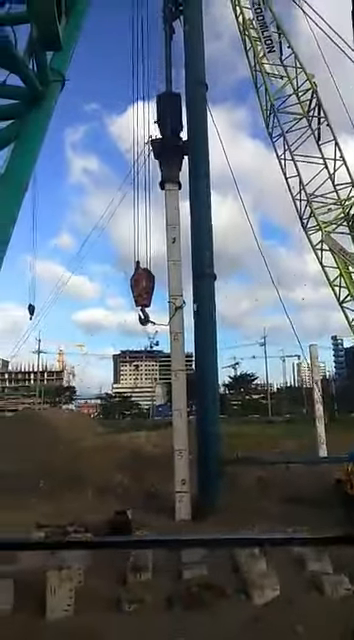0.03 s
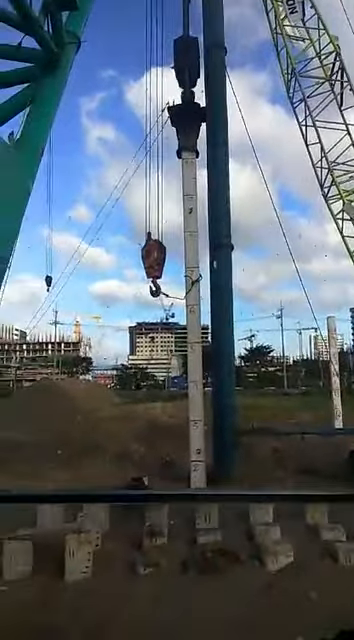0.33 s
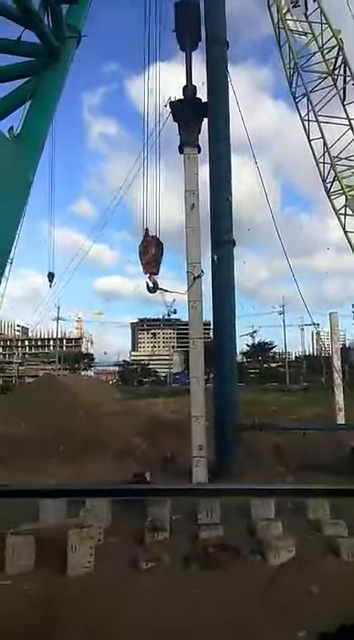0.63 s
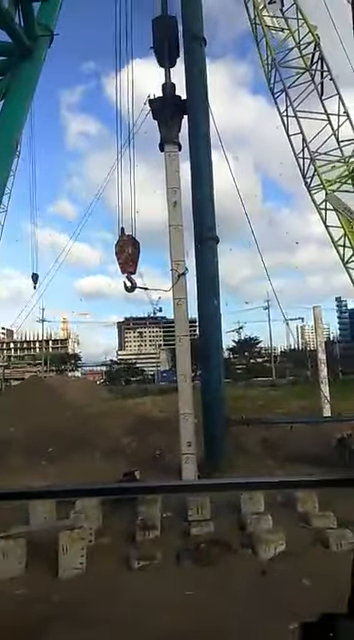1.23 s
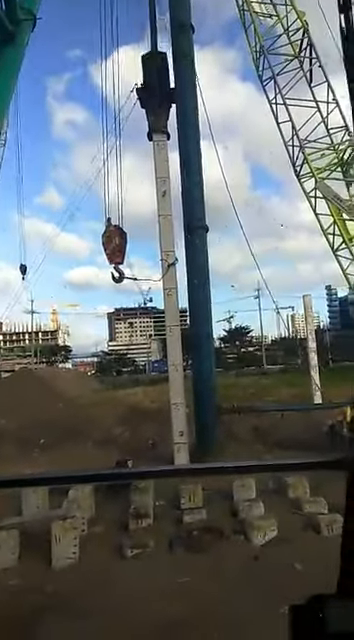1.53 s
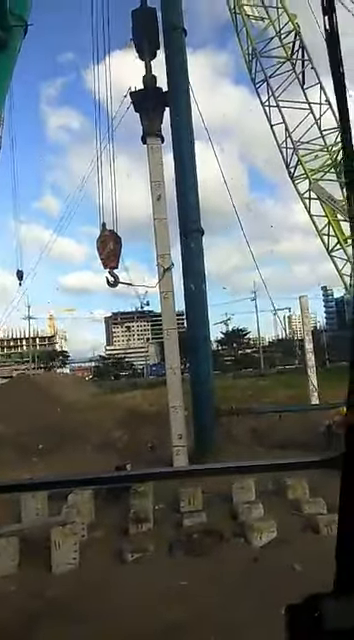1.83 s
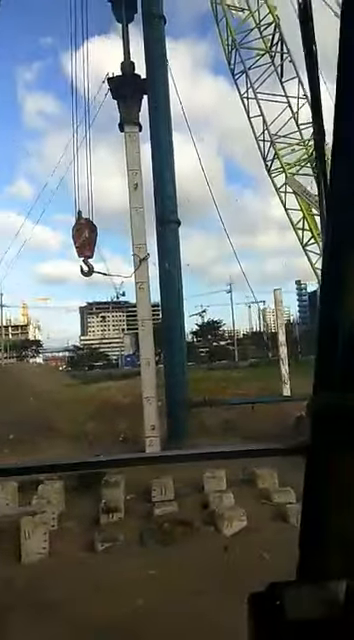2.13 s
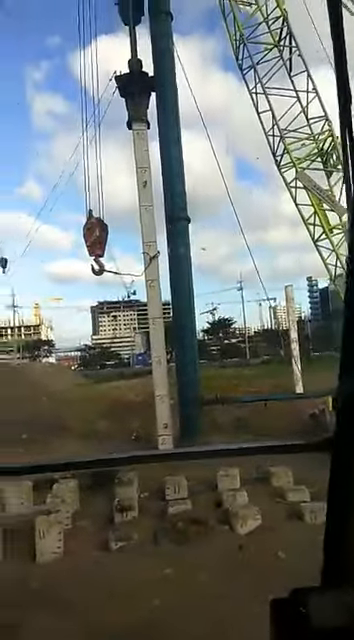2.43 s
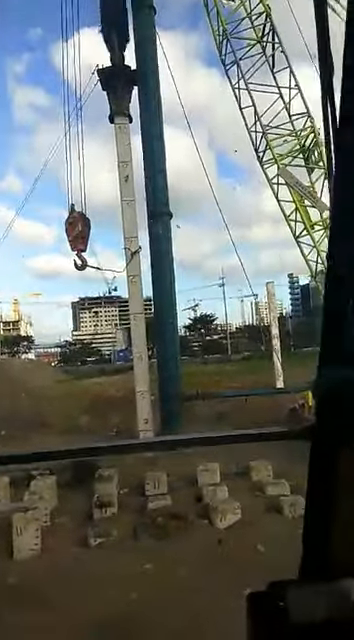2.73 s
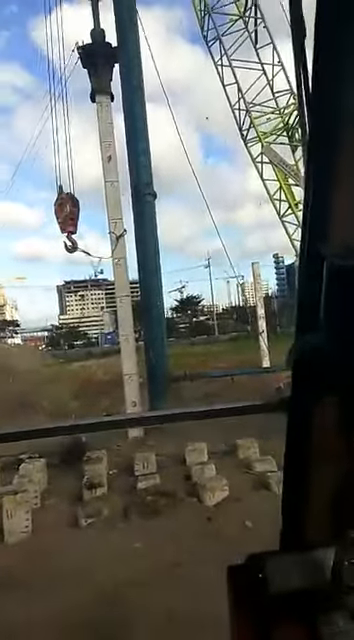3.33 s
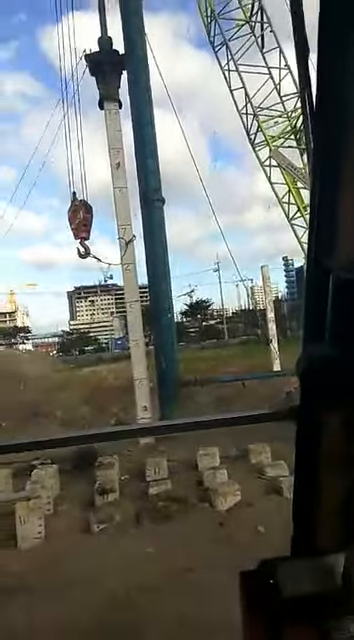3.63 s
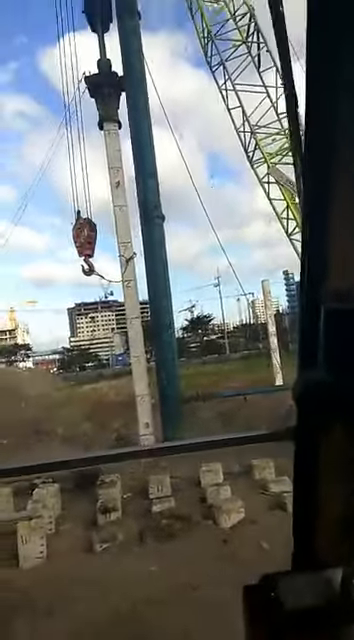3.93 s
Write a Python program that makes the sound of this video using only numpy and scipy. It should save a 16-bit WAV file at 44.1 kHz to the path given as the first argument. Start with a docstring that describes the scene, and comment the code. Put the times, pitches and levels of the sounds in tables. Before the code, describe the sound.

A pile hammer strikes a concrete pile three times, each blow a clack, a hiss, then a steel crash and deep echoing boom. Heard from a cab, with an idling engine, repeated squeaks and loose steel clanking.

```python
"""A pile hammer strikes a concrete pile every 1.4 s, heard on two microphones in an idling machine's cab.
Each cycle is a clack of the release, a hiss and hollow roar as the ram falls, then a steel crash
and a deep beating boom, with the open yard throwing back echoes. A dry bearing squeaks at its own
steady pace, loose steel clanks in between, and the engine hums underneath."""
import sys
import numpy as np
from scipy import signal
from scipy.fft import rfft, irfft
from scipy.io import wavfile

SR = 44100
rng = np.random.default_rng(int(sys.argv[2]) if len(sys.argv) > 2 else 0)


def pcm_store(signal):
    """Save signal as 16-bit PCM."""
    levels = np.round(np.clip(np.atleast_2d(signal), -1, 1) * 32767)
    wavfile.write(sys.argv[1], SR, levels.astype(np.int16).T)


N = 176400


def amp(db):
    """Decibels to gain."""
    return 10 ** (np.asarray(db) / 20)


def pan(db):
    """Microphone gains, the left db louder than the right."""
    return amp([[db / 2], [-db / 2]])


def unit(x):
    """Scales to an rms of one."""
    return x / np.sqrt(np.mean(x ** 2) + 1e-20)


def read(points, hz):
    """Reads a table on a log-frequency axis."""
    f, value = np.transpose(points)
    return np.interp(np.log(hz + 1), np.log(f + 1), value)


def add(mix, s, sound):
    """Mixes a sound in at time s."""
    at = round(s * SR)
    sound = sound[..., max(-at, 0):]
    part = mix[:, max(at, 0):][:, :sound.shape[-1]]
    part += sound[..., :part.shape[1]]


def drift(size, hz):
    """Random wandering, up to about the given rate."""
    f = np.fft.rfftfreq(N, 1 / SR)
    return unit(irfft(rfft(rng.standard_normal(N)) * np.exp(-(f / hz) ** 2), N))[:size]


# How alike the two microphones hear noise: (frequency [Hz], correlation [capped at 1])
MIC_LIKENESS = [(100, 1.2), (280, 0.76), (590, 0.77), (1260, 0.05), (2700, 0)]
def noise(gain_at, size=SR):
    """Noise of a given spectrum at both microphones, alike in the bass only."""
    hz = np.fft.rfftfreq(size, 1 / SR)
    mid, side = rfft(rng.standard_normal((2, size)))
    same = np.clip(read(MIC_LIKENESS, hz), -1, 1)
    mid, side = mid * np.sqrt(1 + same), side * np.sqrt(1 - same)
    return unit(irfft(np.array([mid + side, mid - side]) * gain_at(hz), size))


def broad(points, comb_db, size=SR):
    """Noise that falls away below its first point, combed in the treble by many small resonances."""
    own, shared = np.array([drift(N, 30), drift(N, 30)]), drift(N, 30)
    comb = np.tanh(own + shared)
    def gain_at(hz):
        ripple = comb[:, np.minimum(hz * 10, N - 1).astype(int)] * np.minimum(hz / 2000, 1)
        return amp(read(points, hz) + comb_db * ripple) * np.minimum(hz / points[0][0], 1) ** 2
    return noise(gain_at, size)


def envelope(attack_s, hold_s, t60):
    """One second of rise, hold and exponential release."""
    t = np.arange(SR) / SR
    rise = np.sin(np.pi / 2 * np.minimum(t / attack_s, 1)) ** 2
    return rise * np.exp(-np.log(1000) * np.maximum(t - attack_s - hold_s, 0) / t60)


def ring(modes, attack_s):
    """Struck steel: dying modes that reach each microphone at any phase."""
    t = np.arange(SR) / SR
    return sum(amp(db) * envelope(attack_s, 0, t60) * np.sin(2 * np.pi * (hz * t + rng.random((2, 1))))
               for hz, db, t60 in modes)


def rattle(depth_db, hz):
    """Uneven gain from many small contacts."""
    return unit(amp(depth_db * drift(SR, hz)))


# Engine and pump hum, centred between the microphones: (frequency [Hz], level [dB])
ENGINE_HUM = [(57.5, -35), (86, -33.5), (114, -38), (161, -39), (253, -40.5), (316, -43.5), (405, -39)]
# Rumble and hiss in the cab: (frequency [Hz], relative level [dB])
CAB_RUMBLE = [(20, -17), (42, -19.5), (90, 0.5), (168, -6.5), (192, -14), (242, -9), (276, -11), (409, -12),
              (654, -20), (968, -21), (1260, -25.5), (3760, -33), (12800, -58.5), (16700, -85)]
def engine():
    """The machine idles around the microphones: wavering hum over a slightly throbbing rumble."""
    t = np.arange(N) / SR
    hum = 0
    for hz, db in ENGINE_HUM:
        swell = amp(db + 2.5 * drift(N, hz=1.17))
        pitch = hz + 4.5 * drift(N, hz=6.44)
        hum += swell * unit(np.sin(2 * np.pi * np.cumsum(pitch) / SR))
    rumble = amp(-27.5) * broad(CAB_RUMBLE, comb_db=2, size=N)
    throb = 1 + 0.14 * np.sin(2 * np.pi * 14 * t)
    return hum + rumble * throb * amp(0.38 * drift(N, hz=24))


def yard_echoes(x):
    """Scattered echoes from across the yard, ringing longest from 2.5 to 6 kHz."""
    taps = rng.standard_normal((2, 2 * SR)) * (rng.random((2, 2 * SR)) < .06)
    hz, t, spectra = signal.stft(taps, SR, nperseg=256)
    t60 = read([(200, 2.6), (800, 1.63), (2500, 4.26), (6000, 4.3), (11000, 1.8)], hz)[:, None]
    colour_db = read([(100, -18), (300, -8), (800, -5), (2500, -15.5), (6000, -16), (11000, -21.5)], hz)
    fade = np.minimum(t / 0.052, 1) * np.exp(-np.log(1000) * t / t60)
    tail = signal.istft(spectra * amp(colour_db)[:, None] * fade, SR, nperseg=256)[1]
    return signal.fftconvolve(x, tail / 18, axes=1)[:, :N]


# The arch of one squeak: (time [s], pitch [Hz], relative level [dB])
SQUEAK_ARCH = [(0, 1640, -11), (.007, 1880, -3), (.021, 1965, 4), (.036, 2110, -8), (.058, 2190, -1),
               (.08, 2260, -6), (.11, 2290, 2), (.123, 2270, -14), (.135, 2250, -4), (.154, 2220, -22)]
# Squeaks, close by on the left: (time [s], level [dB], left minus right [dB])
SQUEAK_TURNS = [(-.085, -23.5, 13), (.530, -31, 8), (1.149, -27, 8), (2.367, -29, 4), (2.991, -23, 4),
                (3.607, -27, 5)]
def bearing(mix):
    """A dry bearing sings on each turn, raspy until it catches; echoes in the cab break it up."""
    s, pitch, level = np.transpose(SQUEAK_ARCH)
    t = np.arange(0, s[-1], 1 / SR)
    size = len(t)
    rasp = .012 + .028 * np.exp(-t / .018)
    for start_s, db, pan_db in SQUEAK_TURNS:
        waver = 1 + rasp * drift(size, hz=440) + .006 * drift(size, hz=45)
        phase = 2 * np.pi * np.cumsum(np.interp(t, s, pitch) * waver) / SR
        overtones = sum(amp(-15 - 11 * k + 3.5 * drift(size, hz=60)) * np.sin((k + 2) * phase)
                        for k in range(4))
        slip_db = 2.3 * drift(size, hz=130)
        tone = amp(db + np.interp(t, s, level) + slip_db) * unit(np.sin(phase) + overtones)
        delays_s = rng.uniform(.003, .016, (2, 4, 1))
        echoes = np.interp(t - delays_s, t, tone, left=0).sum(axis=1)
        add(mix, start_s, pan(pan_db) * (tone + amp(-12) * echoes))


# Chatter of loose steel: (frequency [Hz], relative level [dB])
CHATTER_SPECTRUM = [(300, -25), (1200, 2.5), (2000, 1), (3300, -2.5), (4400, 6), (6500, 3), (7600, -9),
                    (11600, -22.5), (12500, -63)]
# Its ringing: (frequency [Hz], relative level [dB], t60 [s])
STEEL_MODES = [(1860, -6.5, 0.045), (2806, -5.5, 0.061), (3908, -4, 0.16), (4130, 0, 0.2), (2250, -7, 0.19),
               (6331, -16, 0.094), (7235, -12, 0.083), (8340, -9.5, .08), (9350, -15, 0.11),
               (10170, -19.5, 0.35)]
# Clanks, close by on either side:
# (time [s], level [dB], attack [s], relative ring [dB], relative thud [dB], left minus right [dB])
STEEL_CLANKS = [(.797, -29.5, 0.013, -24, -3, -2), (1.165, -22, 0.0088, -29, 0.5, 1),
                (1.989, -36, 0.0049, -13, -7, 7), (2.217, -33, 0.0031, -23, -4, -7),
                (2.284, -28.5, 0.0055, -8, -10, 0.5), (2.447, -13, 0.0055, 1, -21, -1),
                (2.484, -28, 0.0044, 7, -4.5, 1), (3.819, -29.5, 0.0076, -27, -5, -4)]
def loose_steel(mix):
    """Loose steel chatters and rings, sometimes with a dull thud."""
    for s, db, attack_s, ring_db, thud_db, pan_db in STEEL_CLANKS:
        chatter = broad(CHATTER_SPECTRUM, comb_db=10.5) * envelope(attack_s, 0.012, 0.1)
        chatter *= rattle(depth_db=2, hz=400)
        thud = broad([(110, -8), (300, 6), (700, -3), (5000, -35)], comb_db=0)
        thud *= amp(thud_db) * envelope(0.026, 0.021, 0.078)
        ringing = amp(ring_db) * ring(STEEL_MODES, attack_s)
        add(mix, s, amp(db) * pan(pan_db) * (chatter + ringing + thud))


# Screeches from the ram's guides: (time [s], hold [s], pitch [Hz], level [dB])
GUIDE_SCREECHES = [(1.630, .04, 3750, -27), (3.030, .028, 3530, -20), (3.078, .062, 6460, -26)]
def screeches(mix):
    """Steel rubbing on steel catches one fuzzy note at a time."""
    for s, hold_s, hz, db in GUIDE_SCREECHES:
        note = noise(lambda f: 1 / (1 + ((f - hz) / 70) ** 2))
        add(mix, s, amp(db) * note * envelope(0.0083, hold_s, 0.029))


# The release, heard from the cab: (frequency [Hz], relative level [dB])
CLACK_SPECTRUM = [(240, -30), (400, -0.5), (928, -3.5), (1710, -9.5), (2760, -6), (3630, -7), (3910, -6.5),
                  (7080, -14.5), (12800, -34)]
def clack():
    """The release lets go of the ram."""
    return broad(CLACK_SPECTRUM, comb_db=9) * envelope(0.016, 0.011, 0.28) * rattle(depth_db=1.5, hz=220)


# The sliding ram, heard from the cab: (frequency [Hz], relative level [dB])
HISS_SPECTRUM = [(400, 0), (1100, 4.5), (1700, 0.5), (2500, -3), (3200, -3), (6400, -6), (7600, -15),
                 (12800, -33)]
def hiss():
    """The ram scrapes down its guides."""
    return broad(HISS_SPECTRUM, comb_db=5) * envelope(0.04, 0.12, 0.073) * rattle(depth_db=1.5, hz=200)


def shudder(drone_db):
    """A low push and a short drone as the ram falls."""
    t = np.arange(SR) / SR
    push = amp(-14.5) * envelope(0.051, 0.01, 0.14) * np.sin(2 * np.pi * 62 * t)
    drone = amp(drone_db) * envelope(0.034, 0.013, 0.67) * np.sin(2 * np.pi * 251 * t)
    return push + drone


# Hollow resonances out at the hammer: (frequency [Hz], width [Hz], relative level [dB])
ROAR_RESONANCES = [(98, 25, -2), (155.6, 10.5, 0), (244, 31, -6.5), (308.5, 26, -3.5), (361, 13, -9),
                   (460, 34, -1), (660, 72, -4), (772, 46, 2), (886, 42, 3), (940, 130, -1.5)]
def roar():
    """The falling ram drives a gritty rush through hollow resonances."""
    def gain_at(hz):
        powers = (amp(db) ** 2 / width / (1 + ((hz - f) / width) ** 2) ** 2
                  for f, width, db in ROAR_RESONANCES)
        return np.sqrt(sum(powers))
    return amp(-13.5) * noise(gain_at) * envelope(0.035, 0.083, 0.14) * rattle(depth_db=0.5, hz=200)


# The impact and the shaking frame, heard from the cab: (frequency [Hz], relative level [dB])
IMPACT_SPECTRUM = [(250, -8), (570, -0.5), (900, -18), (1500, -1), (2300, -1), (3200, -6.5), (4200, 4.5),
                   (6400, 3), (7600, -7), (9700, -5.5), (12800, -33.5)]
FRAME_SPECTRUM = [(300, 9.5), (900, 3), (1500, -4.5), (2300, -1.5), (3200, -3), (6000, -2.5), (8000, -13),
                  (12500, -27.5)]
def crash():
    """The ram lands: a bright crash, then the frame shakes on."""
    hit = amp(-11) * broad(IMPACT_SPECTRUM, comb_db=4) * envelope(0.0093, 0.014, 0.068)
    frame = amp(-19) * broad(FRAME_SPECTRUM, comb_db=11.5) * envelope(0.032, 0.051, 0.26)
    return hit + frame * rattle(depth_db=1, hz=121)


# The boom and its rebounds, centred between the microphones:
# (time after impact [s], frequency [Hz], half length [s], relative level [dB])
BOOM_SWELLS = [(.040, 106, .024, 0), (.091, 108, .016, -1.5), (.127, 106, .018, -8)]
def boom(mix, impact_s):
    """Pile and ground answer the blow with overlapping low swells."""
    t = np.arange(SR) / SR - .5
    for delay_s, hz, half_s, db in BOOM_SWELLS:
        swell = amp(db - 5.5) * np.exp(-(t / half_s) ** 2) * np.cos(2 * np.pi * hz * t)
        add(mix, impact_s + delay_s - .5, swell)


# The hammer's struck steel: (frequency [Hz], relative level [dB], t60 [s])
ANVIL_MODES = [(1458, -6, .17), (5520, 1, .08), (6023, 1, 0.18)]
# Blows out in the yard:
# (impact time [s], clack time [s], clack level [dB], hiss time [s], hiss level [dB], drone level [dB])
HAMMER_BLOWS = [(.346, .128, -23, 0.21, -19.5, -16), (1.753, 1.533, -20.5, 1.610, -19, -28),
                (3.146, 2.924, -19.5, 2.998, -19.5, -21.5)]
def pile_hammer(far, near, roar_lead_s=.128):
    """The ram is released, falls and strikes; its shudder, ring and boom sound close."""
    for s, clack_s, clack_db, hiss_s, hiss_db, drone_db in HAMMER_BLOWS:
        add(far, clack_s, amp(clack_db) * clack())
        add(far, hiss_s, amp(hiss_db) * hiss())
        add(far, s - roar_lead_s, roar())
        add(near, s - roar_lead_s, shudder(drone_db))
        add(far, s, crash())
        add(near, s, amp(-16) * ring(ANVIL_MODES, attack_s=0.0069))
        boom(near, s)


def scene():
    """The yard from the cab, over the engine: far sounds carry much more echo than near ones."""
    far, near = np.zeros((2, 2, N))
    pile_hammer(far, near)
    loose_steel(near)
    screeches(near)
    bearing(near)
    return far + near + yard_echoes(far + amp(-19) * near) + engine()


# Colour of the microphone pair: (frequency [Hz], left minus right [dB])
MIC_TILT = [(60, -1), (120, 2), (230, 1), (440, 2), (860, -1), (1680, 0.5), (3270, -1), (6360, -2.5),
            (12400, 13.5)]
def record(dry):
    """Each microphone has its own colour; peaks clip, and the treble ends at 12.9 kHz."""
    tilt = read(MIC_TILT, np.fft.rfftfreq(N, 1 / SR))
    coloured = irfft(rfft(dry) * amp([tilt / 2, -tilt / 2]), N)
    lowpass = signal.firwin(301, 12900, window=("kaiser", 7), fs=SR)
    return signal.oaconvolve(np.clip(coloured, -1, 1), lowpass[None], "same")


dry = scene()
out = record(dry)
pcm_store(out)
```